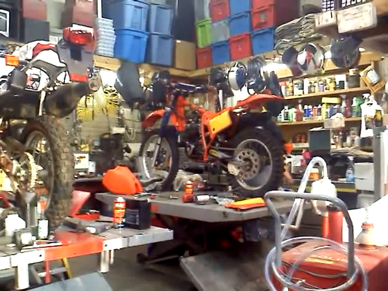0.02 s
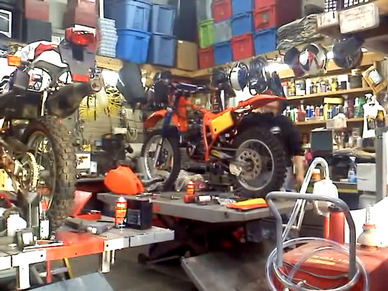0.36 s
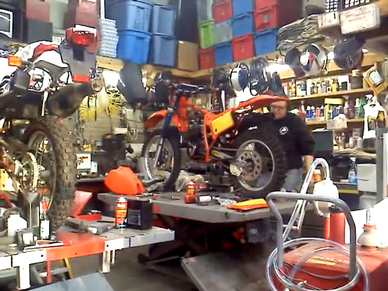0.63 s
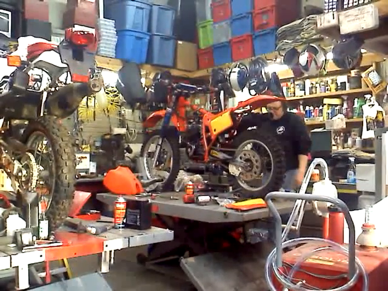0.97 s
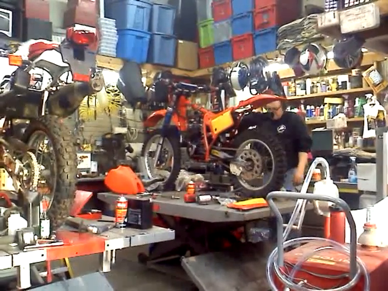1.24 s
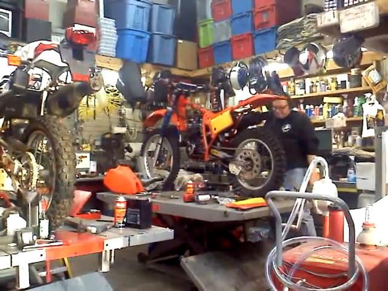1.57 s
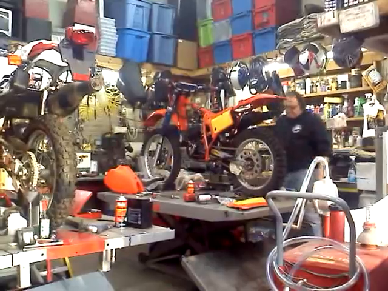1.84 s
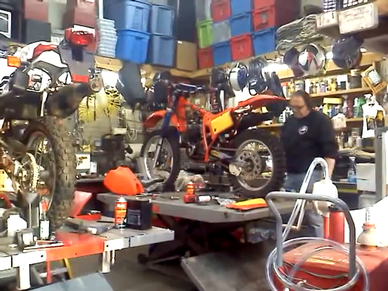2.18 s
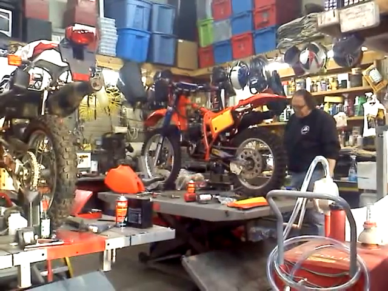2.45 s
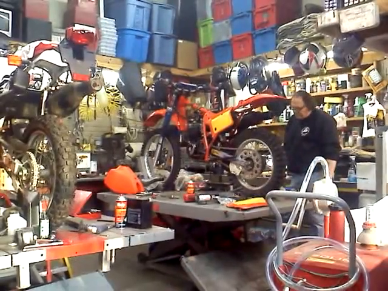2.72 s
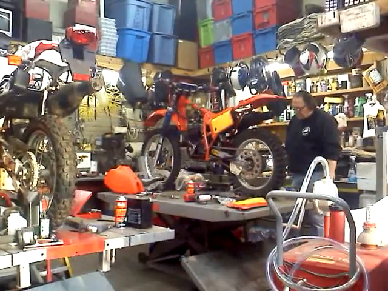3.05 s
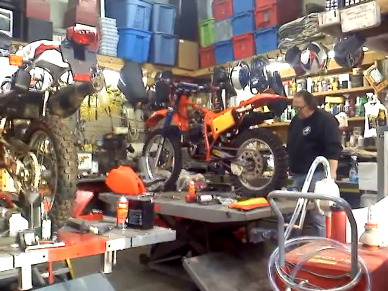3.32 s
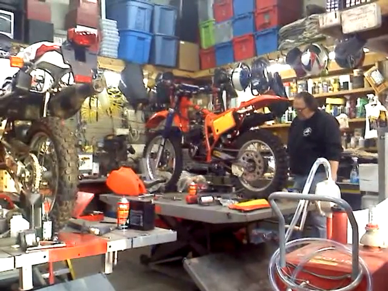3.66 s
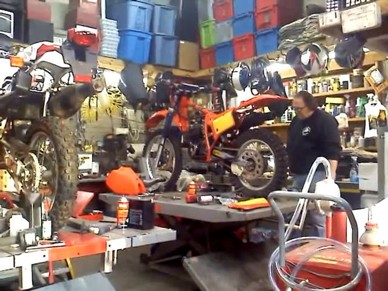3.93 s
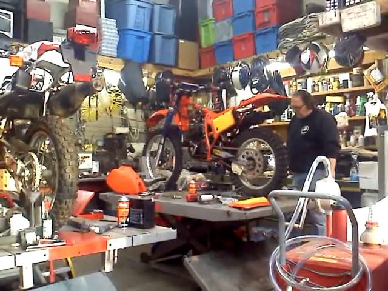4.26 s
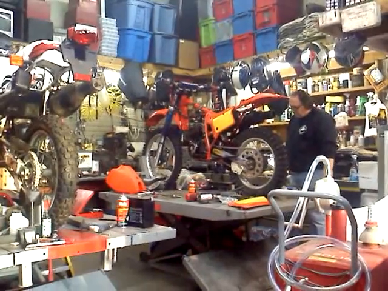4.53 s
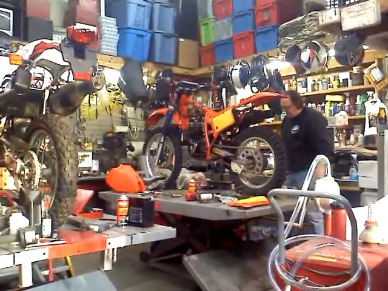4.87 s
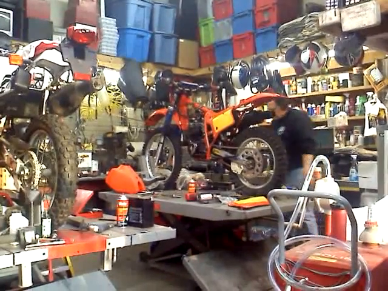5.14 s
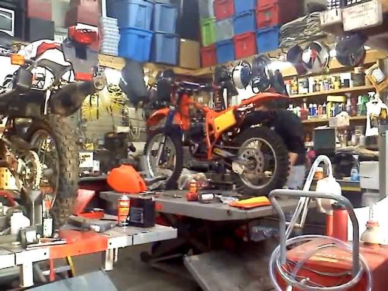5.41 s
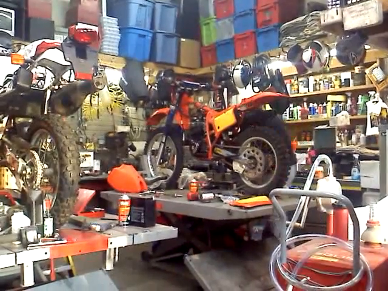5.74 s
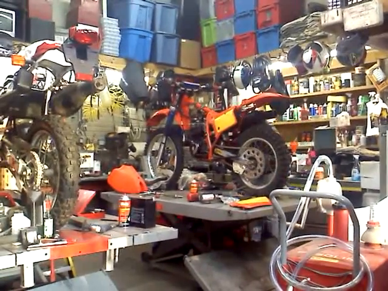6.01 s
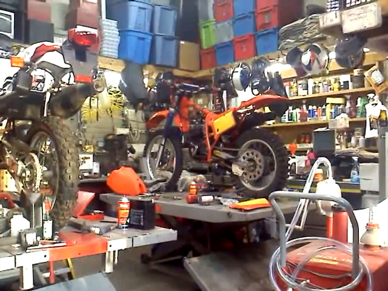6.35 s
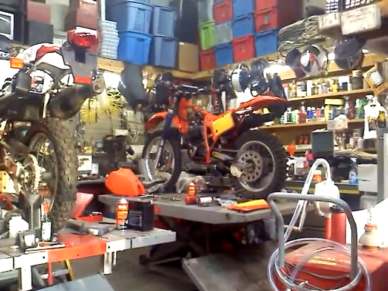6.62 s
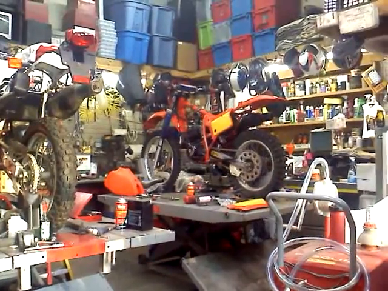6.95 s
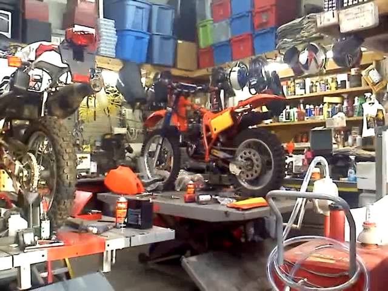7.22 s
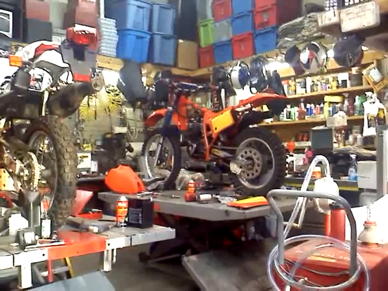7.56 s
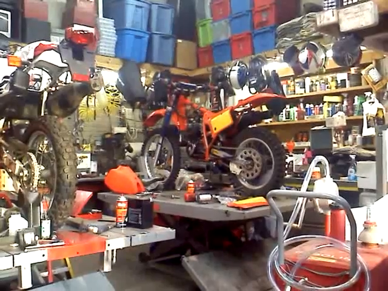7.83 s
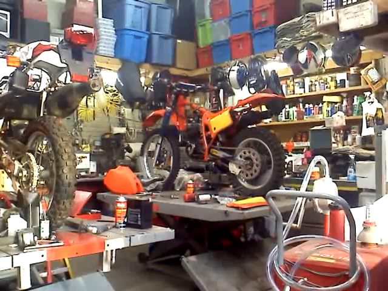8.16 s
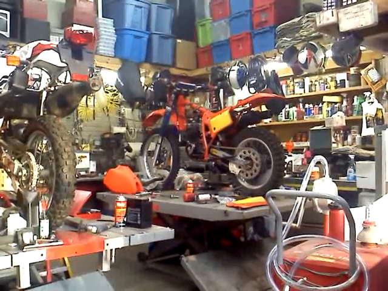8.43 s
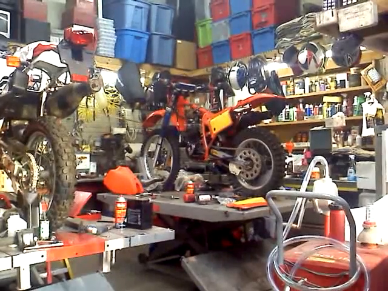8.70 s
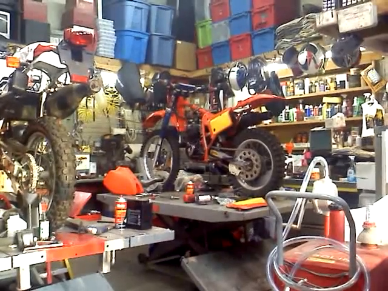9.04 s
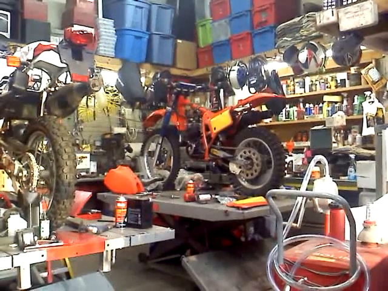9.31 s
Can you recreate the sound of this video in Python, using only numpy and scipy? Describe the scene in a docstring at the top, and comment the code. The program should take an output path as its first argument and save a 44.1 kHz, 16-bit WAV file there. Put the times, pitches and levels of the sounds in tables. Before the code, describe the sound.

A four-stroke motorcycle engine races briefly with a harsh rasp and settles into an uneven, thumping, rattling idle.

```python
"""A single-cylinder four-stroke dirt bike, just started in a crowded garage, races, chuffs and falls to
a lumpy, stumbling idle. Each cycle fires a few gas pulses that boom and honk through the exhaust;
the pipe drones as the revs drop, and turbulent gas rumbles at its end. Valve gear and piston clatter
in the engine metal. A small narrow-band microphone overloads on the revs and the strongest beats."""
import sys
import numpy as np
from scipy import signal
from scipy.fft import rfft, irfft, next_fast_len
from scipy.io import wavfile
from scipy.ndimage import map_coordinates

SR = 44100
rng = np.random.default_rng(int(sys.argv[2]) if len(sys.argv) > 2 else 0)


def put_to_file(sound):
    """Save the sound as 16-bit audio at rate SR, in the file named by the first command-line argument."""
    columns = np.atleast_2d(sound).T  # one column per channel
    safe = np.clip(columns, -1, 1)
    whole_steps = np.round(safe * 32767)
    wavfile.write(sys.argv[1], SR, whole_steps.astype(np.int16))


N = 422478

# the exhaust's low boom: pitch_hz, width_hz, gain_db
BOOM_MODES = [(208.5, 5.5, 37), (247.35, 15.7, 42), (313, 20, 36.8)]
# the exhaust's upper honk: pitch_hz, width_hz, gain_db
HONK_MODES = [(660, 23, 28.2), (715, 28, 30.2), (991.5, 56, 16)]


def amp(db):
    """Decibels to gain."""
    return 10 ** (np.asarray(db) / 20)


def unit(x):
    """Scale to rms 1."""
    return x / np.sqrt(np.mean(x ** 2) + 1e-20)


def curve(rows):
    """One value per sample from rows of time_s, value."""
    return np.interp(np.arange(N) / SR, *np.transpose(rows))


def wobble(rate):
    """A smooth random curve, rate knots a second."""
    return map_coordinates(rng.standard_normal(int(N * rate / SR) + 4), [np.arange(N) * rate / SR])


def filtered(x, response):
    """Pass x through a complex frequency response."""
    size = next_fast_len(N + SR // 2)
    return irfft(rfft(x, size) * response(np.fft.rfftfreq(size, 1 / SR)), size)[:N]


def coloured(x, points):
    """EQ x with rows of freq_hz, gain_db, joined on a log axis."""
    freq_hz, gain_db = np.transpose(points)
    return filtered(x, lambda hz: amp(np.interp(np.log(hz + 1), np.log(freq_hz), gain_db)))


def resonate(x, modes, widen=1):
    """Ring x through resonances of alternating polarity: pitch_hz, width_hz, gain_db."""
    def response(hz):
        total = 0
        for k, (pitch_hz, width_hz, gain_db) in enumerate(modes):
            damping = 1j * hz * width_hz * widen
            total += (-1) ** k * amp(gain_db) * damping / (pitch_hz ** 2 - hz ** 2 + damping)
        return total
    return filtered(x, response)


def pulses(times, sizes):
    """A train of single impulses."""
    at = np.round(times * SR).astype(int)
    inside = (at >= 0) & (at < N)
    return np.bincount(at[inside], sizes[inside], N)


def moments(cycle, place):
    """The times at which the engine passes one place in its cycle."""
    return np.interp(np.arange(int(cycle[-1] - place) + 1) + place, cycle, np.arange(N) / SR)


def combustion(fired_s, overrun_burn=.3, idle_burn=.8, idle_from_s=1.28, rebound=.62, scatter_db=.8):
    """Each charge burns weakly on the overrun, poorly in a stumble, harder on the fuel a stumble leaves."""
    # the cold engine's stumbles: start_s, length_s, burn (0 misfire, 1 full)
    stumbles = [(1.41, .14, .08), (2.18, .07, .2), (2.39, .14, .1), (3.36, .14, .55), (3.92, .14, .42),
                (4.48, .07, .42), (4.7, .14, .22), (5.19, .07, .27), (5.55, .35, .55), (7.09, .07, .3),
                (7.37, .21, .33), (7.73, .14, .18), (7.94, .07, .2), (8.15, .14, .42), (8.44, .07, .3),
                (8.58, .07, .4), (8.79, .07, .55), (8.93, .14, .15), (9.21, .07, .25), (9.36, .14, .45)]
    burn = np.where(fired_s < idle_from_s, overrun_burn, idle_burn)
    for start_s, length_s, poor_burn in stumbles:
        burn = np.where((fired_s >= start_s) & (fired_s < start_s + length_s), poor_burn, burn)
    recovery = np.maximum(np.diff(burn, prepend=burn[0]), 0)
    return (burn + rebound * recovery) * amp(scatter_db * rng.standard_normal(len(fired_s)))


def exhaust(cycle, scatter=0.11, racing_db=-5, bark_db=-18, cycle_jitter_s=.00022, puff_jitter_s=.00011):
    """Every cycle puffs into the pipe and rings it; a poor burn loses mainly the first blast."""
    # one cycle's gas pulses and their echoes: delay_s, size, burn_share (part that needs a good burn)
    puffs = [(0, 1.0, 1), (.00364, 0.43, 1), (0.0121, 1, 0), (0.0219, 0.77, 0.7), (.02979, .85, .3),
             (0.0455, 0.56, 0.1)]
    fired_s = moments(cycle, 0)
    burn = combustion(fired_s)
    # the separate beats stand out only once the revs have dropped
    beat = amp(np.interp(fired_s, [1.0, 1.3], [racing_db, 0]))
    fired_s = fired_s + cycle_jitter_s * rng.standard_normal(len(fired_s))
    gas = np.zeros(N)
    for delay_s, size, burn_share in puffs:
        late, uneven = rng.standard_normal((len(fired_s), 2)).T
        strength = beat * size * (1 - burn_share + burn_share * burn) * (1 + scatter * uneven)
        gas += pulses(fired_s + delay_s + puff_jitter_s * late, strength)
    # a little of each pulse leaves the pipe unrung, as a dry knock
    bark = coloured(gas, [(200, 2), (420, 29), (1000, 22.5), (2000, 15), (4000, -18.5)])
    return resonate(gas, BOOM_MODES + HONK_MODES) + amp(bark_db) * bark


def pipe_drone(low_hz=278, high_hz=688, high_db=-10, waver_rad=0.53, flutter_db=2.5):
    """Fast firings keep two pipe resonances singing, heard as a pair of wavering tones."""
    # the drone swells as the revs fall, then dies away: time_s, level_db
    swell = [(0, -37), (.75, -25), (1.03, -16.5), (1.15, -21), (1.3, -16), (1.45, -60)]

    def tone(hz):
        phase = 2 * np.pi * hz * np.arange(N) / SR + waver_rad * wobble(35)
        return np.sin(phase) * amp(flutter_db * wobble(25))
    return amp(curve(swell)) * unit(tone(low_hz) + amp(high_db) * tone(high_hz))


def turbulence(cycle, load_db, rumble_db=-33, load_follow=0.34, throb_db=2.6, churn_db=-26, thump_db=-10):
    """Gas noise: a throbbing rumble, a churn as the valve opens, and the chuffs of the racing engine."""
    # rough, bell-shaped gusts of exhaust: peak_s, half_length_s, boom_db, honk_db
    chuffs = [(0.131, 0.033, -6, -31), (0.246, 0.049, -25.5, -7), (0.358, .03, -4.5, -31),
              (0.532, .02, -17.5, -15.5), (0.748, 0.027, -33, -17.5), (0.933, .04, -24, -19.5),
              (1.324, 0.0074, -18.5, -23)]
    # tone of the low turbulence at the tailpipe: freq_hz, gain_db
    rumble_eq = [(15, -24), (30, -14.5), (52, -2), (100, 2), (180, 4), (330, -28), (600, -2.5),
                 (2000, -79.5)]
    t = np.arange(N) / SR
    boom, honk = np.zeros((2, N))
    for peak_s, half_length_s, boom_db, honk_db in chuffs:
        gust = np.exp(-.5 * ((t - peak_s) / half_length_s) ** 2)
        boom += gust * amp(boom_db)
        honk += gust * amp(honk_db)
    churn = amp(churn_db) * np.exp(np.cos(2 * np.pi * (cycle - .022)) - 1)
    pulsing_db = throb_db * np.cos(2 * np.pi * (cycle - .22))
    flow = amp(rumble_db + load_follow * (load_db - np.median(load_db)) + pulsing_db)
    boom_noise, honk_noise, rumble_noise = rng.standard_normal((3, N))
    boom_noise = coloured(boom_noise, [(130, -25.5), (215, 0)])  # the open end radiates little deep bass
    return (np.hypot(boom, churn) * unit(resonate(boom_noise, BOOM_MODES, widen=3))
            + honk * unit(resonate(honk_noise, HONK_MODES, widen=4.1))
            + (flow + amp(thump_db) * boom) * unit(coloured(rumble_noise, rumble_eq)))


def clatter(cycle, load_db, knock_db=-2.5, knock_t60_s=0.04, scatter_db=1.87, throb_db=1.0,
            ring_db=-3.0, ring_wander_db=3.5, gain_db=6):
    """Valve and piston knocks ride on the rattle of chain and gears; under load they turn to a rasp."""
    # valve and piston knocks: place_in_cycle (0-1), size
    strikes = [(0.039, 0.93), (0.092, 0.45), (0.258, 0.74), (0.408, 1), (.65, 0.85), (0.881, 1)]
    # ring of the cylinder fins and cases: pitch_hz, width_hz, gain_db
    fin_modes = [(1720, 150, -5), (2076, 170, -8.5), (2195, 110, -1.2), (2724, 63, -2.5), (3160, 290, -3.7)]
    # tone of the engine metal at idle: freq_hz, gain_db
    metal_eq = [(120, -40), (380, -4), (560, -7.5), (850, -9.5), (1000, -5.5), (1400, -10), (1750, -8.5),
                (2000, -4.5), (2170, -4.5), (2480, -6), (2750, -7.5), (3250, -8.5), (4500, -9.5)]
    # harsh tone of the racing engine: freq_hz, gain_db
    rasp_eq = [(120, -40.5), (380, -7), (600, -5.5), (850, -7), (1100, -4), (1400, -7), (1750, -3.5),
               (2150, -1.5), (2480, -1.5), (2750, -2), (3250, -4), (3600, -2.5), (4500, -3)]
    hits = np.zeros(N)
    for place, size in strikes:
        times = moments(cycle, place)
        hits += pulses(times, size * amp(scatter_db * rng.standard_normal(len(times))))
    fade = amp(-60 * np.arange(SR // 10) / SR / knock_t60_s)
    knocks = unit(signal.fftconvolve(hits, fade)[:N] * rng.standard_normal(N))
    rattle = unit(amp(throb_db * np.cos(2 * np.pi * (cycle - .2))) * rng.standard_normal(N))
    blows = rattle + amp(knock_db) * knocks
    # each fin resonance is driven at its own wandering strength
    ring = sum(resonate(blows * amp(ring_wander_db * wobble(32)), [mode]) for mode in fin_modes)
    metal = garage(blows + amp(ring_db) * ring)
    racing = np.clip((load_db + 16.5) / 8, 0, 1)
    idle = (1 - racing) * unit(coloured(metal, metal_eq))
    rasp = racing * unit(coloured(metal, rasp_eq))
    return amp(load_db + gain_db) * (idle + rasp)


def garage(x, t60_s=0.15, wet_db=-6.5, block_samples=6000):
    """Direct sound plus the short, dense answer of shelves and walls, with a fresh tail for each block."""
    t = np.arange(SR // 4) / SR
    fade = amp(-60 * t / t60_s)
    wet = np.zeros(N + SR)
    for start in range(0, N, block_samples):
        tail = rng.standard_normal(len(t)) * fade
        answer = signal.fftconvolve(x[start:start + block_samples], tail / np.linalg.norm(tail))
        wet[start:start + len(answer)] += answer
    return x + amp(wet_db) * wet[:N]


def scene():
    """One crankshaft times exhaust, gas noise and clatter, while the pipe drones over the falling revs."""
    # engine speed, racing and then idling: time_s, cycles_per_s
    speed = [(0, 19.762), (.4, 27.528), (1.3, 15.546), (1.5, 14.275), (2.61, 14.461), (3.96, 14.145),
             (4.5, 14.378), (4.77, 14.165), (5.31, 14.19), (5.58, 13.897), (6.39, 14.524), (7.74, 13.858),
             (8.01, 14.211), (9.36, 14.109), (9.58, 14.74)]
    # mechanical noise, falling with the load: time_s, relative_level_db
    load = [(0, 0), (.38, -1), (.43, -5.5), (.52, -3), (.59, -7.5), (.66, -4.5), (.92, -10.5), (1.02, -15),
            (1.35, -18.4), (2.4, -18.9), (3.5, -17.6), (5.0, -19), (7.0, -18.7), (7.5, -17.9), (8.2, -19),
            (9.58, -18.2)]
    cycle = np.cumsum(curve(speed)) / SR
    load_db = curve(load) + .55 * wobble(rate=4)  # never quite steady
    return (exhaust(cycle) + pipe_drone() + turbulence(cycle, load_db) + clatter(cycle, load_db))[None]


def record(dry, ceiling=0.612, top_hz=16000):
    """The dull microphone overloads flat, which adds the only high treble: a crackle on the peaks."""
    # the microphone's narrow band, ahead of the overload: freq_hz, gain_db
    mic_eq = [(3250, 0), (3480, -2), (3800, -12.5), (4200, -22.5), (4550, -45), (5000, -72)]
    # gentle tilt after the overload: freq_hz, gain_db
    output_eq = [(4000, 1), (8200, -0.5), (10000, -0.5), (16000, -1)]
    overloaded = np.clip(coloured(dry[0], mic_eq), -ceiling, ceiling)
    return filtered(coloured(overloaded, output_eq), lambda hz: hz < top_hz)[None]


dry = scene()
out = record(dry)
put_to_file(out)
```